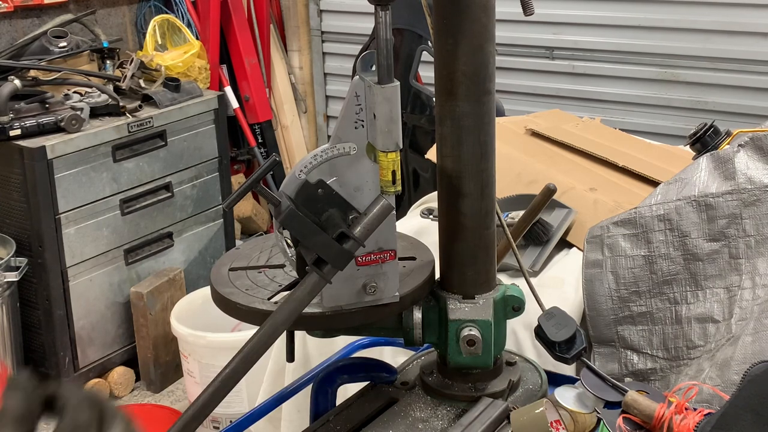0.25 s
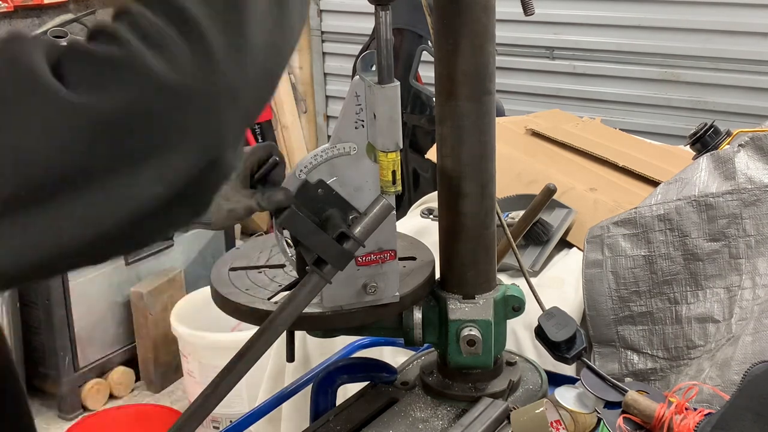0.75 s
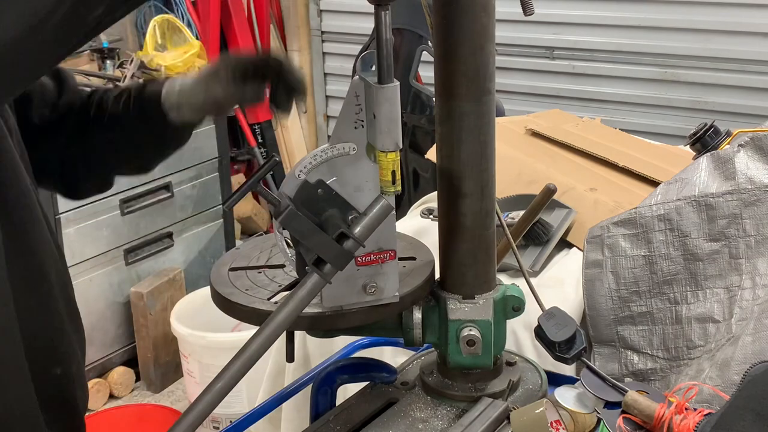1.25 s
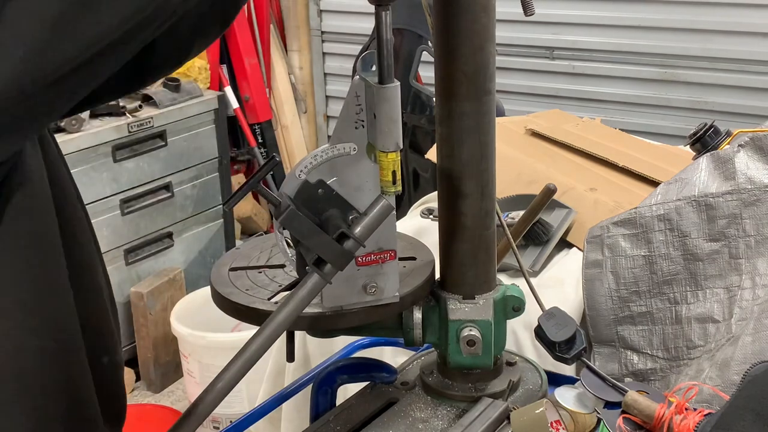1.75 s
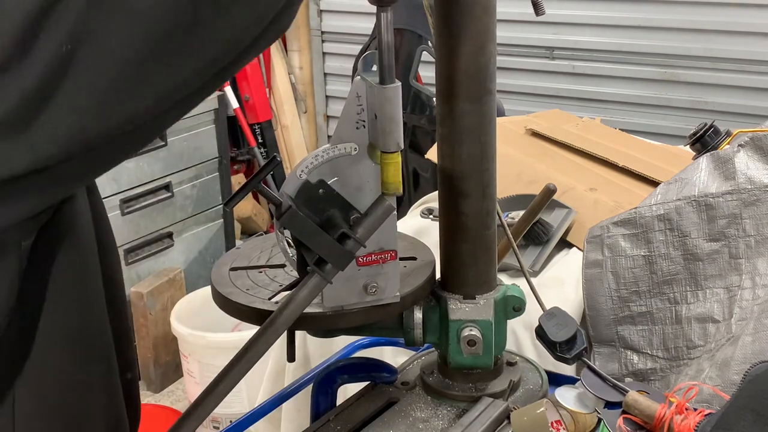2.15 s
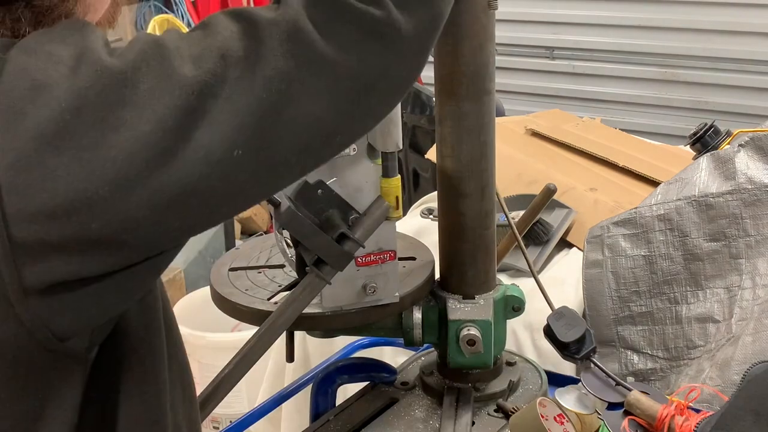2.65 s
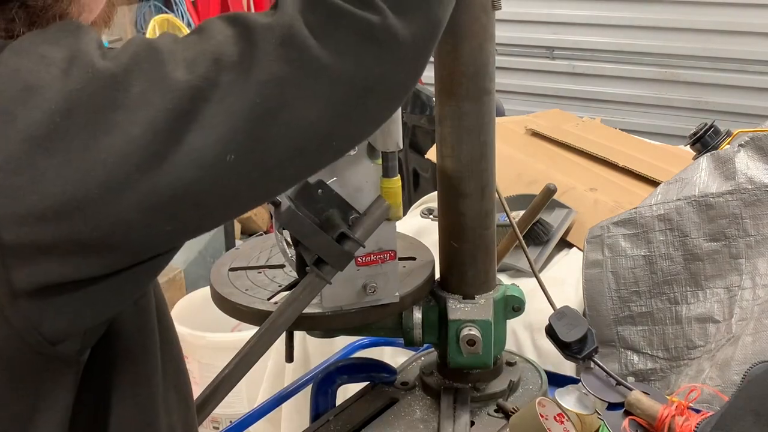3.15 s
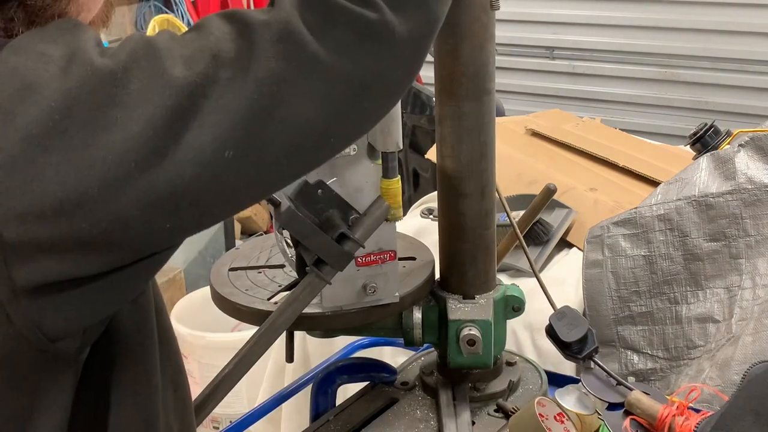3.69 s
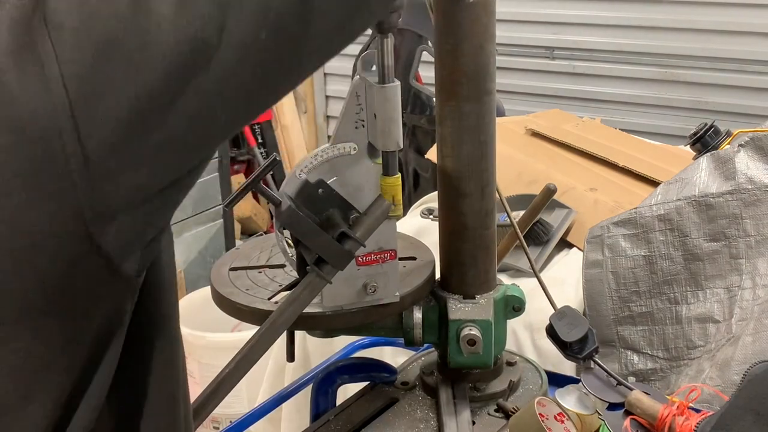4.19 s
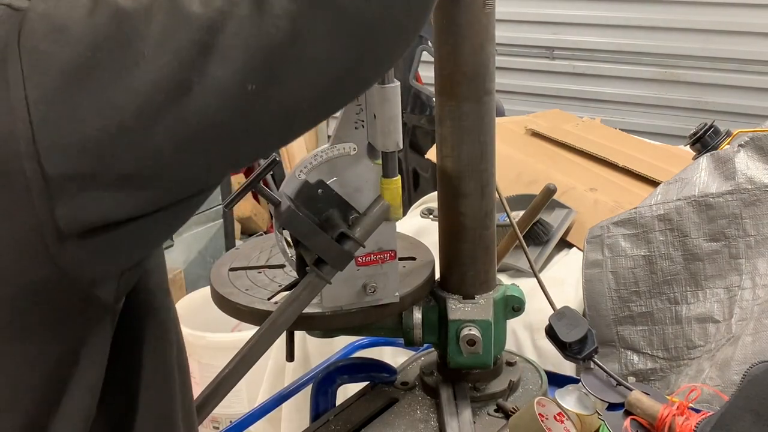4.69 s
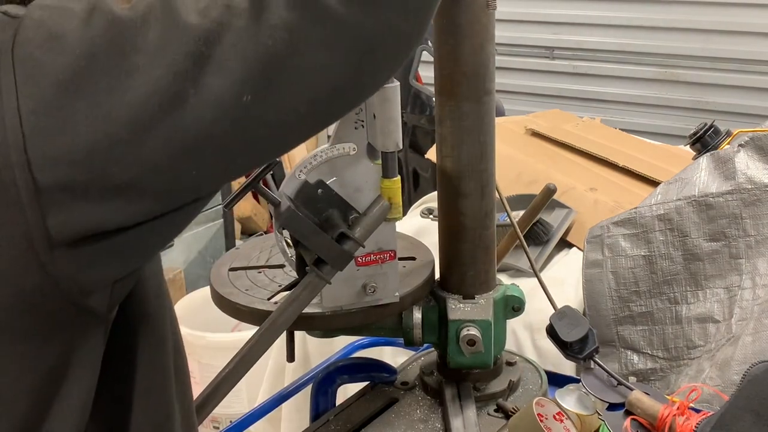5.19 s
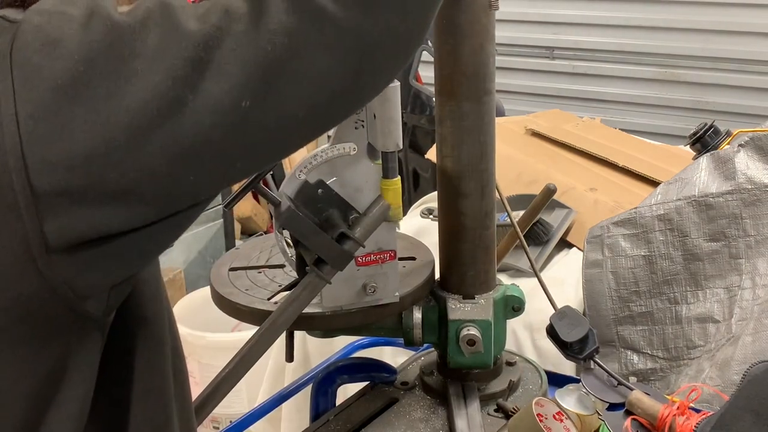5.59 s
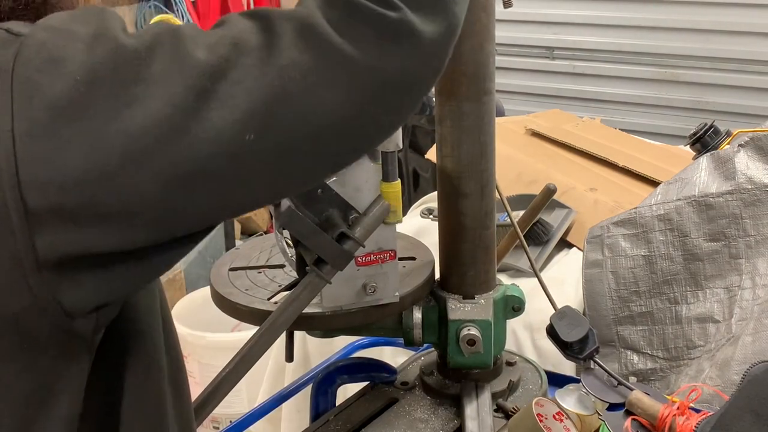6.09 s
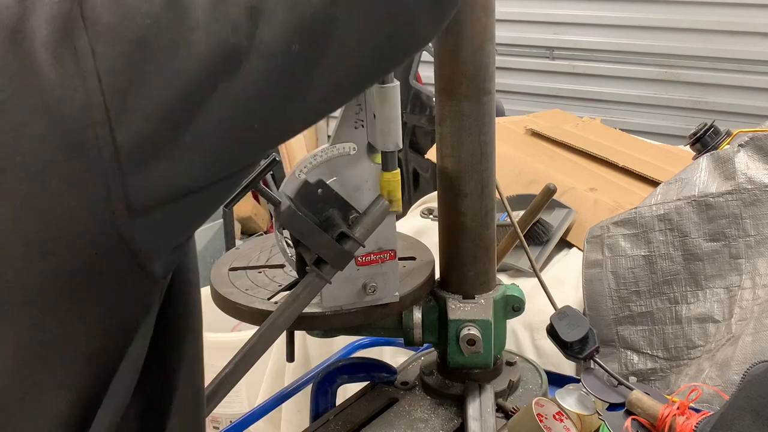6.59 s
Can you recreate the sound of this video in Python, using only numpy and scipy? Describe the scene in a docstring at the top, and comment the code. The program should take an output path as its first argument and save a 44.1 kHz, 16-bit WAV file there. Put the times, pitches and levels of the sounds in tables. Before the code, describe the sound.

In a quiet garage, a couple of dull footsteps, a rustling jacket and a sharp click come first. Then a drill press motor spins up and a hole saw bites into a steel tube with bright metallic clicks. It grinds loudly in several bursts, with a gritty scrape, a thin squeal and a low drone. The motor whirrs and hums between the bursts. The sound is close and in stereo, with a short echo.

```python
"""A drill press cuts a steel tube with a hole saw, heard close up in a quiet garage.
Footfalls, a rustling jacket and a click come first, then the motor spins up with metallic clicks.
The saw bites in bursts: teeth tear off chips, the cup squeals and the table drones under the load.
Between bursts only the motor, belt and bearings whirr. The machine is spread in stereo,
with a short echo off the walls."""
import sys
import numpy as np
from scipy import signal
from scipy.fft import rfft, irfft
from scipy.io import wavfile
from scipy.ndimage import uniform_filter1d

SR = 44100
rng = np.random.default_rng(int(sys.argv[2]) if len(sys.argv) > 2 else 0)


def materialize(psi):
    """Save the field psi as 16-bit PCM at rate SR to the path in sys.argv[1].

    A 1-D psi becomes a single channel; in a 2-D psi each row is a channel.
    """
    bounded = np.clip(np.atleast_2d(psi).T, -1, 1)
    quanta = np.round(bounded * 32767).astype(np.int16)
    wavfile.write(sys.argv[1], SR, quanta)


N = 301644

# broad colour of tube, vice and table together: freq_hz, level_db
STEEL_COLOUR = [(30, -75), (80, -13.5), (205, -10.5), (260, -2), (1300, -4), (2800, -7.5), (6500, -10.5),
                (9400, -11), (12000, -12.5), (16000, -27)]
# rings of tube and vice: pitch_hz, width_hz, boost_db
STEEL_MODES = [(266, 18, 5.5), (316, 37, 9), (516, 58, 8.5), (655.5, 15, 10), (770, 8.4, 10),
               (964, 63, 3.5), (1220, 140, 6.5), (1500, 39, 1), (1620, 320, 3.5), (2050, 65, 3.5),
               (2620, 120, 2)]
SWITCH_ON_S, SPIN_UP_S = 1.9254, 0.11
SURGE_DB, SETTLE_S = 14.5, 0.43  # the motor's extra level at start-up, and its decay
TIME_S = np.arange(N) / SR


def amp(db):
    return 10 ** (np.asarray(db) / 20)


def unit_rms(x):
    return x / np.sqrt(np.mean(x ** 2) + 1e-20)


def curve_at(points, hz):
    """Interpolate (freq_hz, value) points over log frequency."""
    freq_hz, value = np.transpose(points)
    return np.interp(np.log(hz + 1), np.log(freq_hz + 1), value)


def body(x, colour, modes=()):
    """Causal filter: a broad colour with resonant peaks on it."""
    hz = np.abs(np.fft.fftfreq(16384, 1 / SR))
    peaks = 1 + sum(amp(db) ** 2 / (1 + (2 * (hz - f) / width) ** 2) for f, width, db in modes)
    log_gain = np.log(amp(np.maximum(curve_at(colour, hz), -100))) + np.log(peaks) / 2
    taps = np.fft.ifft(np.exp(np.conj(signal.hilbert(log_gain)))).real[:8192]  # minimum phase
    return signal.oaconvolve(x, taps / np.linalg.norm(taps))[:N]


def resonance(x, hz, width):
    """One steep resonance: two peaks in series."""
    flat = [(20, 0), (SR, 0)]
    narrow = body(x, flat, [(hz, width, 60)])
    return body(narrow, flat, [(hz, 3 * width, 60)]) * np.sqrt(5 * width / SR)


def band(x, lo_hz, hi_hz):
    edges_hz = [lo_hz, min(hi_hz, SR / 2 - 100)]
    return signal.sosfilt(signal.butter(2, edges_hz, "bandpass", fs=SR, output="sos"), x)


def wander(lo_hz, hi_hz):
    """Slow random motion of rms 1."""
    return unit_rms(band(rng.standard_normal(N), lo_hz, hi_hz))


def grit(per_s, spread_db):
    """Random ticks of uneven size."""
    size = amp(spread_db * np.minimum(rng.exponential(1, N), 5)) * rng.choice([-1., 1.], N)
    return unit_rms(size * (rng.random(N) < per_s / SR))


def room_tone():
    """Low rumble and faint hiss, mostly common to both channels."""
    # still garage air: freq_hz, level_db
    air = [(20, -33), (55, -1.5), (81, -9), (513, -33.5), (7000, -45), (11300, -38.5), (16000, -40)]
    shared, left, right = (body(rng.standard_normal(N), air) for _ in range(3))
    return amp(-69.5) * unit_rms(shared + .5 * np.array([left, right]))


def rustle_and_click():
    """Swells of cloth rustle and one sharp, bright click, all shaped from finely crackling hiss."""
    # jacket and glove rustle, and the click: peak_s, level_db, rise_s, fall_s, tilt_db_per_octave
    swells = [(.02, -69.5, 0.12, 0.23, -1.5), (.19, -59.5, 0.11, 0.13, -6), (.168, -48.5, 0.012, 0.093, 3),
              (.29, -55.5, 0.1, 0.078, -6.5), (.53, -59, 0.11, 0.077, -3.5), (.77, -56.5, 0.064, 0.085, -5),
              (.89, -52, 0.055, 0.075, -1), (0.9442, -28.5, 0.0011, 0.0062, 7),
              (.968, -45, 0.061, 0.064, -0.5), (1.24, -67.5, 0.044, 0.065, -5.5),
              (1.55, -67, .015, 0.073, -6.5)]
    t, out = TIME_S, np.zeros(N)
    hiss = rng.standard_normal(N) + 0.29 * grit(per_s=450, spread_db=-2.0)
    for peak_s, db, rise, fall, tilt in swells:
        swell_db = db - 20 * np.where(t < peak_s, (peak_s - t) / rise, (t - peak_s) / fall)
        out += amp(swell_db) * body(hiss, [(60, -30), (250, -2 * tilt), (16000, 4 * tilt)])
    return out


def footfalls():
    """A sole meets the floor with a dull knock and a short scuff."""
    # steps: start_s, level_db, pitch_ratio
    steps = [(.256, -35, 1.13), (.753, -32.5, .95), (1.538, -49.5, .6)]
    # modes of sole and floor: pitch_hz, level_db, t60_s
    slab = [(103, -4, 0.22), (173, 1, 0.14), (229, 5, 0.084), (338, -5, 0.13), (527, 5.5, 0.03)]
    t, out = np.arange(9000) / SR, np.zeros(N)
    for start_s, step_db, pitch in steps:
        knock = sum(amp(db - 60 * t / t60) * np.sin(2 * np.pi * hz * pitch * t) for hz, db, t60 in slab)
        knock *= np.minimum(t / 0.0044, 1)  # the sole rolls on
        scuff = 0.53 * band(rng.standard_normal(len(t)), 200, 1800) * amp(-60 * t / 0.071)
        out[round(start_s * SR):][:len(t)] += amp(step_db) * (knock / abs(knock).max() + scuff)
    return out


def motor_gain():
    """The motor spins up loudly, settles, then slowly gets quieter."""
    run_db, fade_db_per_s = -36.5, 0.48
    age = np.maximum(TIME_S - SWITCH_ON_S, 0)
    surge_db = SURGE_DB * np.exp(-np.maximum(age - SPIN_UP_S, 0) / SETTLE_S)
    return np.minimum(age / SPIN_UP_S, 1) ** 2.12 * amp(run_db + surge_db - fade_db_per_s * age)


def motor_whirr():
    """Bearing and belt rattle excites the casting: a growl that gains treble as it spins up."""
    # broad colour of the whirr: freq_hz, level_db
    colour = [(30, -63), (80, -30), (230, -15.5), (450, -13), (900, -12.5), (3250, -18.5), (4000, -22),
              (8000, -21.5), (12000, -27), (16000, -36)]
    # rings of head casting and belt cover: pitch_hz, width_hz, boost_db
    head_modes = [(158, 12, 14), (259, 14, 12), (410, 30, 11), (500, 30, 12), (555, 16, 11), (990, 120, 4),
                  (1660, 40, 11), (1767, 30, 14), (3238, 60, 13)]
    rattle = 0.72 * rng.standard_normal(N) + 0.36 * grit(per_s=1700, spread_db=0.5)
    casting = unit_rms(body(rattle * amp(wander(24, 68)), colour, head_modes))
    growl = signal.filtfilt(*signal.butter(2, 1100, fs=SR), casting)
    speed = np.clip((TIME_S - SWITCH_ON_S) / SPIN_UP_S, 0, 1)
    return motor_gain() * (growl * (2 - speed) + (casting - growl) * speed)


def hum_and_whine():
    """The windings hum; the bearings whine, fluttering, and fall quiet under load."""
    # magnetic hum, relative to the whirr: mains_multiple, level_db
    hum = [(2, -26), (6, -12), (8, -13), (10, -13)]
    # bearing whine, relative to the whirr: pitch_hz, level_db, change_db_per_s
    whine = [(1766, -10, -3), (3232, -9, -3.2)]
    mains_hz, load_threshold_db = 50, -36
    age = TIME_S - SWITCH_ON_S
    load_db = np.maximum(bites()[0] - load_threshold_db, 0)
    duck_db = load_db + SURGE_DB * np.exp(-np.maximum(age, 0) / SETTLE_S)
    tones = [(k * mains_hz, db + 1.7 * wander(0.66, 6.1)) for k, db in hum]
    tones += [(hz, db + slope * age - duck_db + 3 * wander(3, 30)) for hz, db, slope in whine]
    wavering_s = np.cumsum(1 + .003 * wander(2, 20)) / SR
    sines = sum(amp(db) * np.sin(2 * np.pi * (hz * wavering_s + rng.random())) for hz, db in tones)
    return motor_gain() * np.sqrt(2) * sines


def metal_clicks():
    """Sharp, bright clicks as the motor starts and during the cut: brief bursts ring the steel."""
    # metallic clicks: start_s, level_db
    clicks = [(1.939, -40.5), (1.9734, -25.5), (2.149, -14.5), (2.217, -14), (2.2516, -6.5), (2.294, -13),
              (2.3132, -13.5), (2.423, -16), (2.4766, -16), (2.832, -35), (3.116, -16), (4.855, -18),
              (2.9813, -15), (4.1468, -30.5), (4.297, -22), (4.5523, -17.5), (4.5998, -13.5), (5.02, -12),
              (5.1865, -21), (5.5, -17.5)]
    t, kicks = np.arange(1500) / SR, np.zeros(N + 1500)
    for start_s, db in clicks:
        burst = rng.standard_normal(len(t)) * amp(-60 * t / .013)
        kicks[round(start_s * SR):][:len(t)] += amp(db) * burst
    steel = body(kicks[:N], STEEL_COLOUR, STEEL_MODES)
    return amp(9.5) * (band(steel, 3100, 25000) + band(steel, 10500, 25000) + 0.17 * steel)


def bites():
    """Level and treble of the cut in dB, digs included: quick touch, late drift, steady release."""
    # pushes on the feed lever: touch_s, rise_s, ease_s, first_db, last_db, treble_db
    pushes = [(2.069, 0.034, 2.528, -22, -19.5, 2), (2.56, 0.048, 2.816, -30, -29.5, -0.5),
              (2.82, 0.028, 3.45, -21.5, -19, 3), (4.102, 0.077, 4.27, -36.5, -37.5, -1.5),
              (4.278, 0.029, 4.514, -32.5, -31.5, -5), (4.5, 0.11, 6.05, -21.5, -39.5, 3.5),
              (6.317, 0.037, 6.599, -33.5, -36, 1), (6.628, 0.016, 6.9, -32.5, -26.5, -4.5)]
    touch_db, release_db_per_s = -22, 175
    power = treble = 1e-9
    for touch_s, rise_s, ease_s, first_db, last_db, treble_db in pushes:
        age = np.maximum(TIME_S - touch_s, 0)
        db = first_db + (last_db - first_db) * np.minimum(age / (ease_s - touch_s), 1) ** 3.86
        db += touch_db * np.maximum(1 - age / rise_s, 0) ** 2
        db -= release_db_per_s * np.maximum(TIME_S - ease_s, 0)
        bite_power = amp(db) ** 2 * (TIME_S > touch_s)
        power += bite_power
        treble += bite_power * amp(treble_db - 1.5 * np.exp(-age / 0.22)) ** 2  # dull at first
    dig_db, _, dig_treble_db = digs()
    return 10 * np.log10(power) + dig_db, 10 * np.log10(treble / power) + dig_treble_db


def patchy(x, depth_db):
    """The rings of the steel swell and fade in patches about 300 Hz wide and 50 ms long."""
    spectrum = signal.stft(x, nperseg=1024)[2]
    patches = uniform_filter1d(rng.standard_normal(spectrum.shape), size=7, axis=0)
    patches = unit_rms(uniform_filter1d(patches, size=4, axis=1))
    return signal.istft(spectrum * amp(depth_db * patches), nperseg=1024)[1][:N]


def hole_saw():
    """Chips tear off as ticks over a scrape, pulsing with the passing teeth; the cup chatters."""
    turns_per_s, teeth = 6.15, 14
    level_db, treble_db = bites()
    turns = np.cumsum(turns_per_s * (1 + 0.03 * wander(0.5, 4))) / SR
    tooth_ramp = 1 - 2 * (teeth * turns % 1)
    chatter_db = 1.1 * wander(10, 100)
    tear = 0.87 * rng.standard_normal(N) + 0.57 * grit(per_s=4500, spread_db=4)
    steel = body(tear * amp(chatter_db + 1.4 * tooth_ramp), STEEL_COLOUR, STEEL_MODES)
    steel = unit_rms(patchy(steel, depth_db=1.2))
    low = signal.filtfilt(*signal.butter(1, 4300, fs=SR), steel)
    high = (steel - low) * amp(treble_db + chatter_db + 0.5 * tooth_ramp)
    return amp(level_db + 1.82) * (low + high)


def cup_squeal():
    """The thin saw cup rings while the teeth rub, more as it sinks in."""
    # rings of the cup: pitch_hz, width_hz, level_db
    cup_modes = [(2581, 48, 0), (2680, 60, -2.5), (6430, 45, -8), (6525, 45, -7)]
    growth_db_per_s = 1.2
    rub_db = bites()[0] + digs()[1] + growth_db_per_s * TIME_S
    rub = grit(per_s=4000, spread_db=3.5) * amp(rub_db + 1.5 * wander(8, 64))
    return amp(-14.5) * sum(amp(db) * resonance(rub, hz, width) for hz, width, db in cup_modes)


def table_drone():
    """The load shakes the table on its column: an unsteady tone, higher when clamped hard."""
    # course of the drone, relative to the cut: time_s, pitch_hz, level_db
    course = [(2.05, 158.6, -18), (2.3, 177.5, -16.5), (2.53, 180.8, -14.5), (2.8, 162, -21),
              (4.7, 158.7, -20)]
    time_s, hz, db = np.transpose(course)
    cycles = np.cumsum(np.interp(TIME_S, time_s, hz) * (1 + 0.029 * wander(3.4, 17))) / SR
    level_db = bites()[0] + np.interp(TIME_S, time_s, db) + 3.8 * wander(0.83, 18)
    return amp(level_db) * np.sqrt(2) * np.sin(2 * np.pi * cycles)


def digs():
    """The cup digs in for a moment: bell-shaped changes of level, squeal and treble in dB."""
    # changes at each dig: centre_s, level_db, squeal_db, treble_db
    moments = [(2.115, 4.5, 10, -3.5), (2.16, 4, -1, -5), (2.26, 4.5, 3, 1.5), (2.31, -2, 14.5, 9),
               (2.42, -2, 11, 5), (2.495, -1, 7, 7.5), (3.05, 3.5, -12, -2.5), (3.11, 4.5, -13, -3.5),
               (4.317, 5, 5.5, 7.5), (4.44, 4.5, -3, -3), (4.67, 2, 7, 3), (5.2, 1, 5, 2.5),
               (5.728, 2, 8, 1.5), (5.87, 6.5, 8.5, 0.5), (5.959, 4, 8, 0.5), (6.388, 0.5, 8.5, 5),
               (6.55, 7, -8, -6.5), (6.667, 9, -1.5, -2.5)]
    centre_s, *changes = np.transpose(moments)
    t, half_width_s = TIME_S[::64], 0.021
    bells = np.exp(-((t[:, None] - centre_s) / half_width_s) ** 2 / 2)
    return [np.interp(TIME_S, t, bells @ db) for db in changes]


def stereo_spread(x):
    """A left-right phase offset, slight in the lows, swinging widely across the treble."""
    # left-right phase offset: freq_hz, phase_rad
    offset = [(0, 0), (1720, 0.47), (4570, 1.5), (5430, 5), (6700, 8), (7900, 3), (9100, 2.5),
              (10400, -0.64), (11600, 1.5), (12700, -4), (14200, -2), (15300, -5)]
    # left channel over right: freq_hz, level_db
    tilt = [(60, -0.5), (240, -2.5), (950, 1.5), (3770, -3), (15000, 1)]
    hz = np.fft.rfftfreq(N, 1 / SR)
    left = amp(curve_at(tilt, hz) / 2) * np.exp(.5j * np.interp(hz, *np.transpose(offset)))
    return irfft(rfft(x) * np.array([left, 1 / left]), N)


def garage_walls(x):
    """Sparse echoes on each side; three tails take turns as the worker shifts before the machine."""
    # decay of the garage: freq_hz, t60_s
    decay = [(100, 0.41), (1000, 0.24), (8000, 0.046)]
    # wall sound relative to direct: freq_hz, level_db
    colour = [(60, -43), (250, -11), (700, -3.5), (5000, 2), (7800, -10.5), (12000, -20)]
    taps = np.zeros((6, SR // 2))
    arrivals = np.arange(200, SR // 2 - 20, 8) + rng.integers(0, 8, (6, (SR // 2 - 213) // 8))
    np.put_along_axis(taps, arrivals, rng.choice([-1., 1.], arrivals.shape), 1)
    hz, t, bands = signal.stft(taps, SR, nperseg=256)
    bands *= amp(-60 * t / curve_at(decay, hz)[:, None])
    bands /= np.sqrt((abs(bands) ** 2).sum(2, keepdims=True))  # equal energy in every band
    tails = signal.istft(bands * amp(curve_at(colour, hz))[:, None], SR, nperseg=256)[1]
    tails /= np.linalg.norm(signal.istft(bands, SR, nperseg=256)[1][0])
    shares = np.sqrt(2 / 3) * np.cos(2 * np.pi * (4 * TIME_S + np.arange(3)[:, None] / 3))
    return sum(signal.fftconvolve((x * share)[None], pair, axes=1)[:, :N]
               for share, pair in zip(shares, np.split(tails, 3)))


def scene():
    """Machine and worker near the microphone, with the walls and room tone behind them."""
    cutting = hole_saw() + cup_squeal() + table_drone()
    near = cutting + metal_clicks() + motor_whirr() + rustle_and_click() + footfalls()
    return amp(-2.5) * (stereo_spread(near + hum_and_whine()) + garage_walls(near)) + room_tone()


def record(dry):
    """The level dips briefly, the peaks overload softly and the top of the treble is cut."""
    dip_s, fall_s, rise_s, cutoff_hz = 2.591, 0.053, 0.055, 16100
    gain = np.interp(TIME_S, [dip_s - fall_s, dip_s, dip_s + rise_s], [1, .02, 1])
    soft = .9 * np.tanh(dry * gain / .9)
    lowpass = signal.firwin(511, cutoff_hz, window=("kaiser", 9), fs=SR)
    return signal.oaconvolve(soft, lowpass[None], "same")


dry = scene()
out = record(dry)
materialize(out)
```